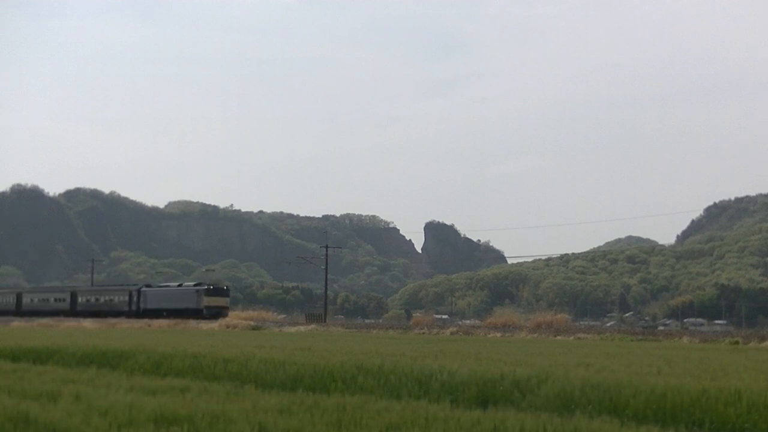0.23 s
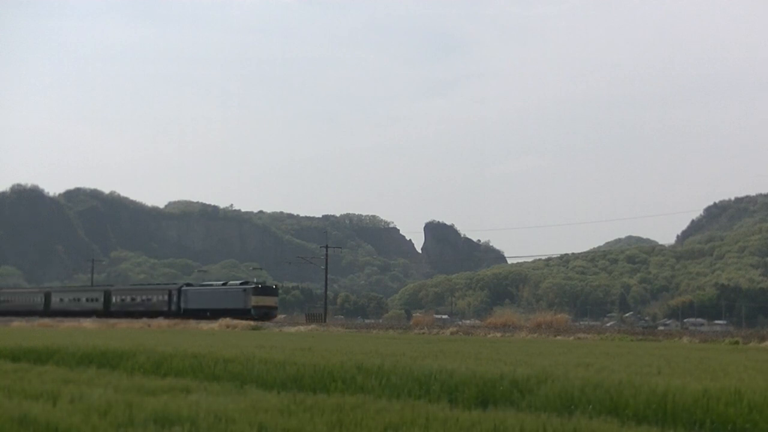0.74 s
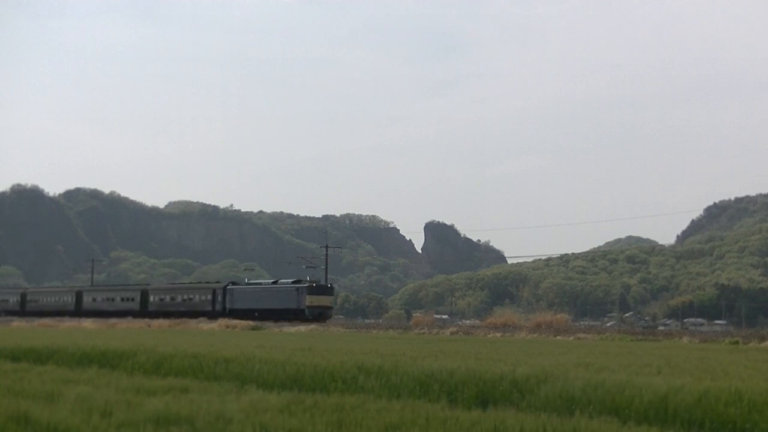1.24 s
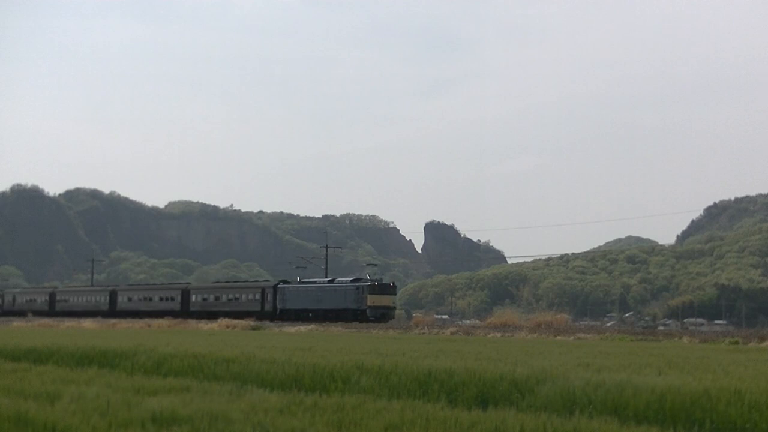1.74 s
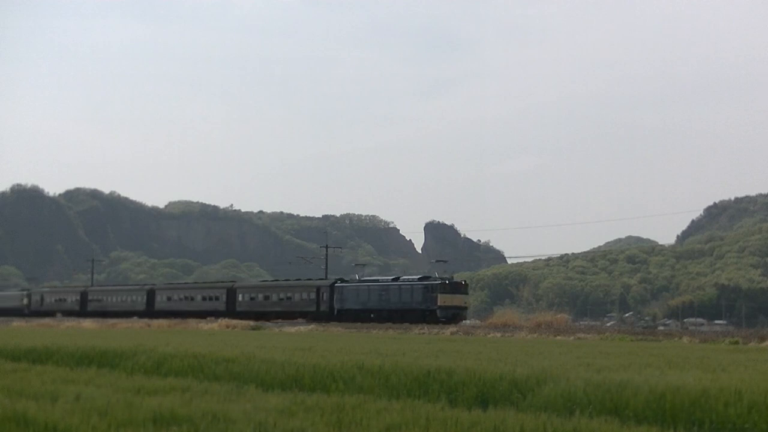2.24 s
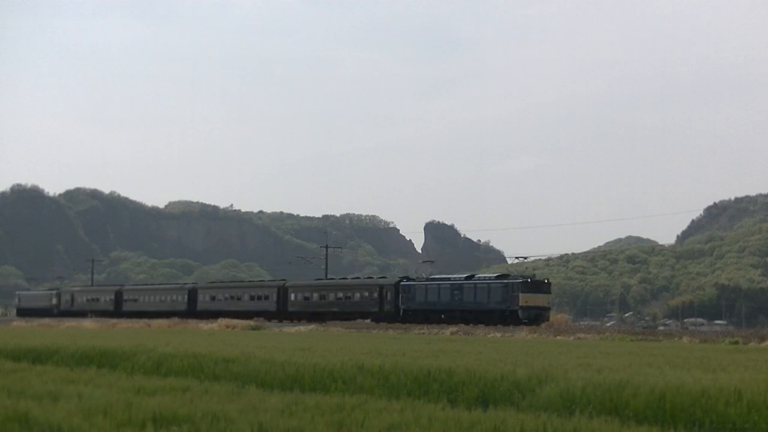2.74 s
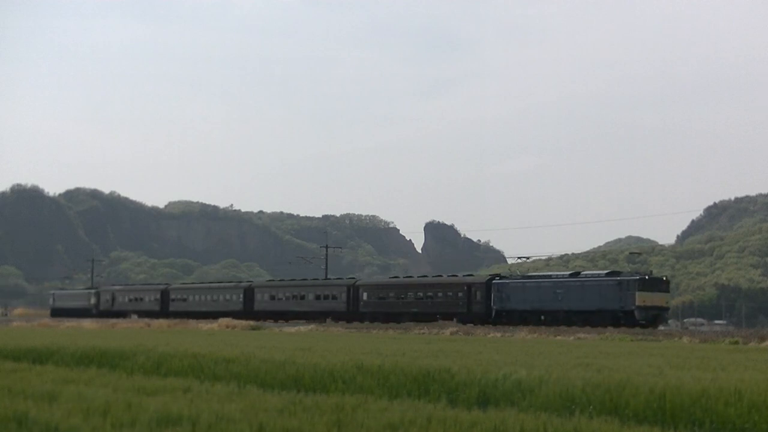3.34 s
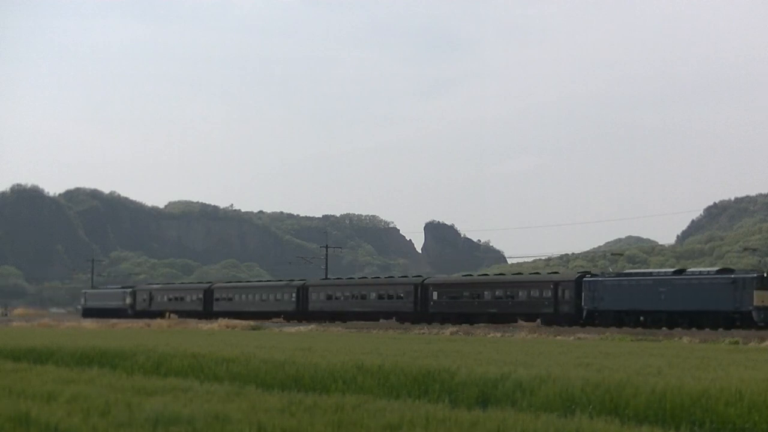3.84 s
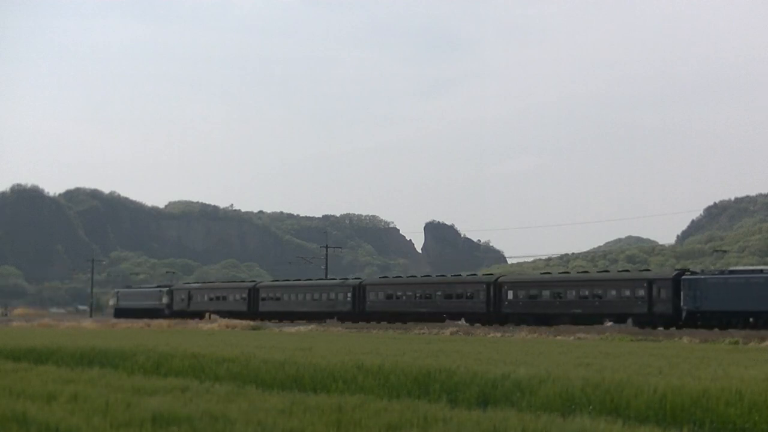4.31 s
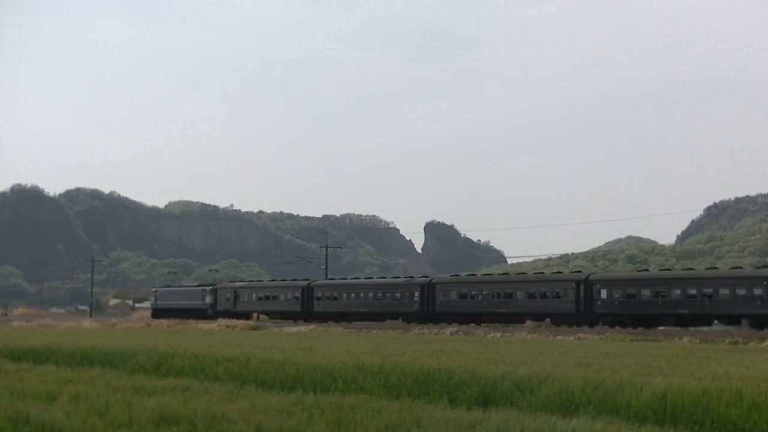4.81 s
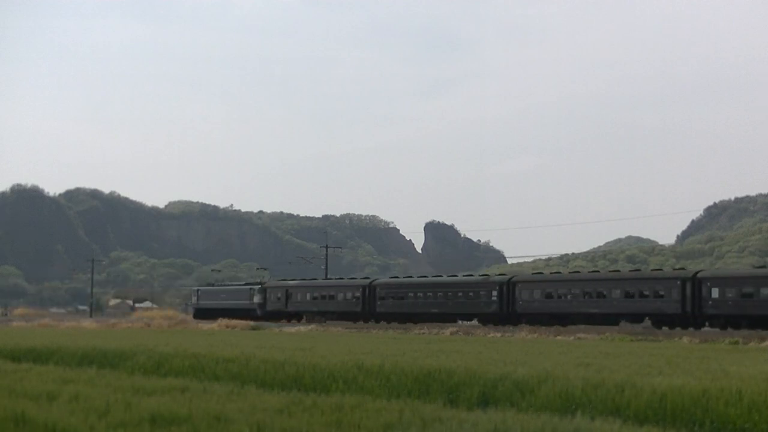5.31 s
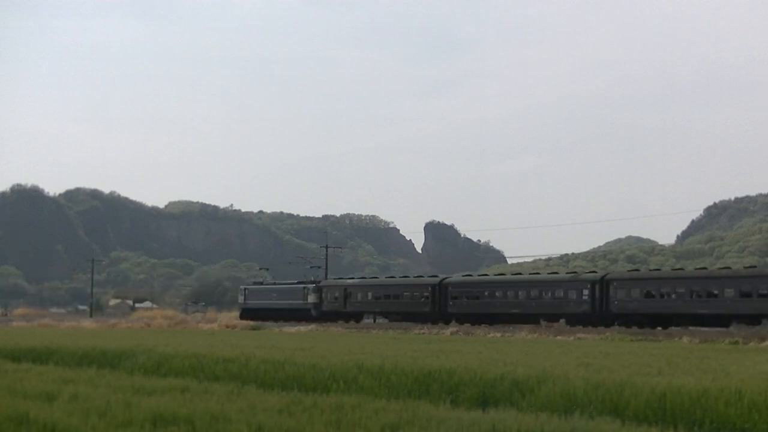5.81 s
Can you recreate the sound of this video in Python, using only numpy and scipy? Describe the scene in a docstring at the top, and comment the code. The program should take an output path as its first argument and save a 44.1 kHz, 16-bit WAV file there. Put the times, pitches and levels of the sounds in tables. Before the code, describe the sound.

In an open field, a light wind gusts softly for the first second or so, with the low, faint roll of a distant train beneath. Close to the microphone, a few quiet camera clicks come at 0.1 to 0.7 s, then sharper ones from 0.8 s. A steady shutter burst runs from about 1.4 to 2.7 s, roughly eight a second. At 1.9 s one high, piercing, slightly fluttering whistle blows for half a second, sags at its end and leaves a faint echo. From 2.6 to 4.2 s louder, overlapping bursts chatter, densest around 2.8 s. The train's rumble, roar and hiss build. From 4.2 s axles thud over rail joints, with a few stray clicks; from 5.2 s the steel clangs grow bright and hard. Flanges rub thinly at 4.6 s, then hiss broadly, and a wheel squeals briefly at 5.5 s. The clatter is still loud at 6 s.

```python
"""Camera clicks and a light, gusty wind are heard first, over the faint roll of a distant train.
An electric locomotive pulling old coaches draws near past open fields and gives one short, high whistle.
Wind and wheels are coloured noise; rail joints and camera parts are blows that ring and die.
Rubbing flanges make a fuzzy note and a broad hiss, and one wheel sings as a single tone.
The whistle is a set of fluttering tones, driven by air pressure and echoed by the surroundings."""
import sys
import numpy as np
from scipy import signal
from scipy.fft import rfft, irfft, next_fast_len
from scipy.io import wavfile
from scipy.ndimage import map_coordinates

SR = 44100
rng = np.random.default_rng(int(sys.argv[2]) if len(sys.argv) > 2 else 0)


def log_audio(samples):
    """Write samples as a 16-bit WAV file to the path given in sys.argv[1]."""
    # one column per channel
    frames = np.atleast_2d(samples).T
    # limit to full scale, then quantise
    limited = np.clip(frames, -1, 1)
    pcm = np.round(limited * 32767).astype(np.int16)
    wavfile.write(sys.argv[1], SR, pcm)


N = 267246


def amp(db):
    """Turn decibels into a gain."""
    return 10 ** (np.asarray(db) / 20)


def unit(x):
    """Scale to rms 1."""
    return x / np.sqrt(np.mean(x ** 2) + 1e-20)


def along(points, hz):
    """Read a (pitch, value) table at any pitch, on a log pitch axis."""
    f, v = np.transpose(points)
    return np.interp(np.log(hz + 1), np.log(f + 1), v)


def colour_of(points):
    """Turn a (pitch_hz, level_db) table into a gain for each pitch."""
    return lambda hz: amp(along(points, hz))


def curves(rows):
    """Draw each column after the time as a curve with one value per sample."""
    s, *cols = np.transpose(rows)
    return [np.interp(np.arange(N) / SR, s, c) for c in cols]


def ramp(start, length):
    """0 until start, then a straight rise to 1 over length seconds."""
    return np.clip((np.arange(N) / SR - start) / length, 0, 1)


def wobble(rate):
    """A smooth random curve with rate random points a second."""
    return map_coordinates(rng.standard_normal(int(N * rate / SR) + 4), [np.arange(N) * rate / SR])


def bell(hz, centre_hz, width_hz):
    """Shape of one resonance, 1 at its centre."""
    return 1 / np.sqrt(1 + (2 * (hz - centre_hz) / width_hz) ** 2)


def pan(db):
    """Left and right gains; positive db makes the left louder by that much."""
    return amp([[db / 2], [-db / 2]])


def add(track, s, sound):
    """Mix a sound into the track at time s."""
    part = track[:, max(round(s * SR), 0):][:, :sound.shape[1]]
    part += sound[:, :part.shape[1]]


# how alike the two ears hear noise: pitch_hz, likeness (1 = the same)
LIKENESS = [(60, 1), (130, 0.98), (290, 0.84), (640, 0.92), (1410, 0.91), (3100, 0.88), (6820, 0.95),
            (15000, 1)]


def noise(colour, size):
    """Stereo noise of rms 1 with the gain colour(hz), nearly alike in both ears."""
    length = next_fast_len(size)
    hz = np.fft.rfftfreq(length, 1 / SR)
    turn = np.arccos(np.clip(along(LIKENESS, hz), 0, 1)) / 2
    white = rfft(rng.standard_normal((2, length)))
    mid, side = irfft(white * colour(hz) * [np.cos(turn), np.sin(turn)], length)[:, :size]
    return unit(np.array([mid + side, mid - side]))


def narrow(hz, width_hz):
    """A fuzzy note of rms 1 that follows the pitch curve hz."""
    phase = 2 * np.pi * np.cumsum(hz) / SR
    return unit(wobble(width_hz) * np.sin(phase) + wobble(width_hz) * np.cos(phase))


def struck(colour, envelope, contact_db):
    """A body rings after a blow: one sharp contact, with chatter under the envelope around it."""
    size = len(envelope)
    push = noise(np.ones_like, size) * envelope
    push[:, np.argmax(envelope)] += amp(contact_db) * envelope.max()
    cepstrum = irfft(np.log(colour(np.fft.rfftfreq(size, 1 / SR)) + 1e-6), size)
    body = np.exp(rfft(2 * cepstrum[:size // 2], size))  # rings only after the push, with that colour
    return unit(irfft(rfft(push) * body, size)) * np.sqrt(np.mean(envelope ** 2))


# how long the surroundings ring: pitch_hz, fall_by_60_db_s
SURROUNDINGS = [(200, 0.5), (2500, 0.36), (10000, 0.29)]


def scatter(x, delay):
    """Diffuse answer of the surroundings after delay seconds; the treble dies first."""
    hz, t, z = signal.stft(rng.standard_normal((2, SR // 2)), SR, nperseg=256)
    decay = 1e-3 ** (t / along(SURROUNDINGS, hz)[:, None])
    tail = signal.istft(z * decay, SR, nperseg=256)[1]
    late = np.pad(x, ((0, 0), (int(delay * SR), 0)))
    return signal.fftconvolve(late, tail / np.linalg.norm(tail[0]), axes=1)[:, :N]


# tone of the wind's buffeting: pitch_hz, level_db
BUFFET = [(22, -52), (35, -16), (60, -3), (120, 0), (200, -9.5), (400, -27), (1000, -25.5), (4000, -50)]
# tone of air stirring the field: pitch_hz, level_db
RUSTLE = [(2000, -9.5), (5000, -3), (8000, -2.5), (11500, 1.5), (13000, -2), (15500, -11)]
# gusts, before the boost at the end of wind(): middle_s, half_width_s, level_db
GUSTS = [(.35, 0.029, -49.5), (.49, 0.12, -48), (.555, 0.023, -43.5), (.7, 0.093, -53.5)]
# the breeze at first and the lull that follows, both before the same boost
BREEZE_DB, LULL_S, LULL_FALL_S, LULL_DB = -54, 1.32, 0.38, -73


def wind():
    """A breeze gusts and dies down, pushing on the left port, pulling on the right; the field rustles."""
    t = np.arange(N) / SR
    force = amp(BREEZE_DB + (LULL_DB - BREEZE_DB) * ramp(LULL_S, LULL_FALL_S))
    for s, width, db in GUSTS:
        force = force + amp(db) * np.exp(-((t - s) / width) ** 2)
    shared, own = [force * amp(wobble(14)) * noise(colour_of(BUFFET), N)[0] for _ in range(2)]
    buffeting = np.array([shared, -.52 * shared + 0.2 * own]) * amp(7.0)
    rustle = amp(-67.5 + 1.2 * wobble(21)) * noise(colour_of(RUSTLE), N)
    return buffeting + rustle


# tone of the low rumble, the roar and the rail hiss, each: pitch_hz, level_db
RUMBLE = [(22, -52.5), (30, -30), (45, -17), (60, 3), (78, -6), (112, -0.5), (160, -11), (230, -19.5),
          (340, -30.5), (570, -70)]
ROAR = [(120, -11.5), (200, -9), (305, 1), (390, -6.5), (490, -4), (570, -3), (730, -2.5), (900, -2),
        (1300, -1.94), (2000, -8.5), (3200, -24), (6000, -64.5)]
HISS = [(700, -14), (1500, -6.5), (2300, 2), (3500, -1.5), (5300, -1.5), (6000, -9.5), (7200, -9.5),
        (8100, -20.5), (9200, -17), (11000, -28.5), (15500, -32.5)]
# wheel and rail resonances: pitch_hz, width_hz, lift_db
WHEELS = [(843, 73, 4), (1820, 38, 2), (2135, 60, 6.5), (2802, 60, 6.5), (3295, 140, 4.5), (4020, 260, 3.5)]
# how the train draws near, used relative to NEAR_DB: time_s, level_db
APPROACH = [(0.0, -52), (0.99, -52.5), (2.68, -46), (4.74, -43.5), (5.11, -43), (5.65, -39.5),
            (6.06, -39.5)]
NEAR_DB = -44
# rise and fall of the rumble, before panning: time_s, level_db
RUMBLE_LEVEL = [(0, -58), (.8, -55.5), (1.25, -54.5), (1.85, -58.5), (2.45, -53), (3.0, -56.5),
                (3.6, -48.5), (4.15, -55.5), (4.6, -50.5), (5.15, -53.5), (6.06, -52)]
# rise of the hiss, before a small cut in rolling(): time_s, level_db
HISS_LEVEL = [(0, -53.8), (.3, -50.5), (1.85, -49.5), (2.5, -45), (3.7, -40.5), (4.2, -43), (5.15, -41.5),
              (5.5, -40), (6.06, -39.5)]
# two wheel hums: pitch_hz, width_hz, level_db at NEAR_DB, growth in db per db of approach
HUMS = [(612.5, 70, -55, 2.4), (934, 70, -55.5, 1)]
# when and for how long the hums sink in pitch, and the share of pitch lost each second
PASS_S, PASS_LENGTH_S, DOPPLER_PER_S = 4.4, .9, 0.037


def rolling():
    """Rough wheels on rough rails: uneven rumble, and a roar, hiss and hums that build as the train nears."""
    near_db = curves(APPROACH)[0] - NEAR_DB
    hiss_db, = curves(HISS_LEVEL)
    rumble_db, = curves(RUMBLE_LEVEL)
    roar_db = -43.5 + 0.92 * near_db

    def ringing(hz):
        """Lift the noise at each wheel and rail resonance."""
        return 1 + sum((amp(db) - 1) * bell(hz, centre, width) ** 2 for centre, width, db in WHEELS)

    def rumble_colour(hz):
        """Add a low drone to the rumble."""
        return colour_of(RUMBLE)(hz) * (1 + .8 * bell(hz, 104, 16))

    rumble = amp(rumble_db + .6 * wobble(21)) * noise(rumble_colour, N)
    roar = amp(roar_db + 0.8 * wobble(17)) * noise(lambda hz: colour_of(ROAR)(hz) * ringing(hz), N)
    hiss_gain = amp(hiss_db - 0.87 + 0.52 * wobble(8.1))
    hiss = hiss_gain * noise(lambda hz: colour_of(HISS)(hz) * ringing(hz), N)
    doppler = 1 - DOPPLER_PER_S * PASS_LENGTH_S * ramp(PASS_S, PASS_LENGTH_S)
    hum = 0
    for hz, width, db, growth in HUMS:
        hum = hum + amp(db + growth * near_db + 1.6 * wobble(8)) * narrow(hz * doppler, width)
    return rumble * pan(1.1) + roar + hiss + hum


# tone of the close flange noise: pitch_hz, level_db
SCRAPE = [(3000, -31), (4500, 0), (5600, -2.5), (6400, -1.5), (7200, -4), (8000, -24), (11000, -33)]
# flanges start to rub the rail head
FLANGE_S, FLANGE_RISE_S, FLANGE_DB = 4.62, .22, -56.5
# their singing note sinks as they pass
FLANGE_HZ, FLANGE_WIDTH_HZ, FLANGE_SAG_HZ_PER_S = 6990, 260, 450
# the rubbing turns broad and loud
SPREAD_S, SPREAD_RISE_S, SPREAD_DB = 5.11, 0.18, -47.5


def flanges():
    """Flanges rub the rail: a thin, sinking note gives way to a broad hiss as the wheels come close."""
    spread = ramp(SPREAD_S, SPREAD_RISE_S)  # share of the broad hiss
    hz = FLANGE_HZ - FLANGE_SAG_HZ_PER_S * (np.arange(N) / SR - FLANGE_S)
    thin = amp(FLANGE_DB) * ramp(FLANGE_S, FLANGE_RISE_S) * narrow(hz, FLANGE_WIDTH_HZ)
    broad = amp(SPREAD_DB) * noise(colour_of(SCRAPE), N)
    return amp(2.1 * wobble(20)) * (np.sqrt(1 - spread) * thin + spread * broad)


SQUEAL_S, SQUEAL_LENGTH_S, SQUEAL_FADE_S = 5.51, 0.26, .04
SQUEAL_HZ, SQUEAL_SAG_HZ_PER_S, SQUEAL_DB = 1282, 120, -46


def squeal():
    """One wheel sings briefly at a single mode, sinking a little as it passes."""
    hz = SQUEAL_HZ - SQUEAL_SAG_HZ_PER_S * (np.arange(N) / SR - SQUEAL_S)
    fade_out_s = SQUEAL_S + SQUEAL_LENGTH_S - SQUEAL_FADE_S
    envelope = ramp(SQUEAL_S, SQUEAL_FADE_S) - ramp(fade_out_s, SQUEAL_FADE_S)
    tone = np.sin(2 * np.pi * np.cumsum(hz) / SR + 0.17 * wobble(60))
    return envelope * amp(SQUEAL_DB + 1.9 * wobble(25)) * np.sqrt(2) * tone


# ways the track bed shakes: pitch_hz, level_db within the thud, swell_s
TRACK_BED = [(127.4, -1, 0.014), (89.5, -6.5, 0.015), (169, -11, 0.017), (376, -9, 0.014)]


def thud():
    """The track bed swells and settles in a few low, heavily damped modes."""
    t = np.arange(SR // 4) / SR
    total = 0
    for hz, db, swell in TRACK_BED:
        envelope = (t / swell * np.exp(1 - t / swell)) ** 2
        near_hz = hz * (1 + 0.038 * rng.standard_normal())
        total = total + amp(db) * envelope * np.sin(2 * np.pi * near_hz * t)
    return total


def clang(colour, attack, t60, size):
    """A blow on steel with many close modes: coloured noise that swells and dies."""
    t = np.arange(size) / SR
    envelope = (1 - np.exp(-t / attack)) * np.exp(-np.log(1000) * t / t60)
    return struck(colour, envelope / envelope.max(), contact_db=18)


# an axle drops into a rail joint, mostly two to a bogie:
# time_s, thud_db, clang_db, clang_fall_by_60_db_s, clang_treble_db
JOINTS = [(4.18, -37.5, -46, .12, -4), (4.306, -41.5, -50, 0.095, -6), (4.368, -42, -40.5, .1, -10),
          (4.427, -39, -55, 0.18, -6), (4.555, -36, -45.5, 0.17, -12), (4.665, -34.5, -42, 0.15, 6),
          (4.79, -37, -45, 0.12, -6), (4.984, -43.5, -56, .12, -6), (5.102, -38, -50, 0.11, -6),
          (5.27, -45, -31.5, 0.2, -10), (5.4, -50, -31, 0.16, -1), (5.515, -48, -31, 0.12, 0),
          (5.573, -54, -35, 0.082, -1.5), (5.644, -46, -29.5, 0.18, 0.5), (5.759, -42, -30, 0.11, 2.5),
          (5.798, -57, -36.5, 0.11, -9), (5.889, -43, -33.5, 0.19, 3), (5.921, -53, -35.5, 0.13, 2),
          (6.015, -43, -41, 0.15, -3)]
# tone of the steel: pitch_hz, level_db
STEEL = [(25, -45), (100, -3.5), (200, -4), (400, -3.5), (490, -5.5), (560, -0.5), (640, 0.5), (740, -6.5),
         (1000, -1), (1400, -14.5), (1900, -6), (2400, -15), (3500, -12.5), (5000, -17.5), (9000, -46),
         (15000, -67)]


def joints():
    """Each axle drops into a rail gap: the track bed thuds and the steel clangs."""
    track = np.zeros((2, N))
    for s, thud_db, clang_db, t60, treble_db in JOINTS:
        def steel(hz):
            """Tilt the treble of the steel for this blow."""
            return amp(along(STEEL, hz) + treble_db * np.clip((hz - 2000) / 1000, 0, 1))
        add(track, s, amp(thud_db) * thud() * pan(.5))
        add(track, s, amp(clang_db) * clang(steel, attack=.0025, t60=t60, size=16384))
    return track


# tone of a camera body: pitch_hz, level_db
CASING = [(200, -29), (600, -6), (1200, -1), (2500, 2), (4000, 1), (5500, 0), (7000, -4.5), (8100, -11.5),
          (9500, -10.5), (11500, -17.5), (15500, -25.5)]
LEAD = 2 ** 9  # samples that a camera part slides before it hits its stop
DETUNE = .02  # random spread of the ring pitch, as a share of it


def click(t60, ring_hz, ring_db, treble_db, snap_db):
    """One stroke inside a camera: the part slides, then hits its stop and rings through the casing."""
    centre_hz = ring_hz * (1 + DETUNE * rng.standard_normal())

    def colour(hz):
        """Casing tone with its treble tilted and one ring lifted."""
        casing = amp(along(CASING, hz) + treble_db * np.clip((hz - 4500) / 5500, 0, 1))
        return casing * (1 + (amp(ring_db) - 1) * bell(hz, centre_hz, 0.18 * centre_hz) ** 2)

    t = np.arange(-LEAD, 7 * LEAD) / SR
    slide = amp(-11) * np.exp(np.minimum(t, 0) / 0.0053)
    age = np.maximum(t, 0)
    blow = amp(-1.1) * np.exp(-np.log(1000) * age / t60) * (1 + 0.14 * np.exp(-age / 0.00082))
    return struck(colour, np.where(t < 0, slide, blow), snap_db)


def camera(exposures, level, cycle, rattle_db, size):
    """Each exposure repeats a cycle of strokes, with size small gear ticks scattered between them."""
    first_db, drift_db = level
    track = np.zeros((2, N))
    begin, end = cycle[0][0], cycle[-1][0]
    for s in exposures:
        db = first_db + drift_db * (s - exposures[0])
        for offset, stroke_db, *stroke in cycle:
            gain = amp(db + stroke_db + rng.normal(0, 0.9))
            add(track, s + offset - LEAD / SR, gain * click(*stroke))
        for when, pitch, softness in rng.random((size, 3)):
            offset = begin + when * (end - begin)
            tick = click(.012, 3000 + 7000 * pitch, ring_db=6, treble_db=4, snap_db=12)
            add(track, s + offset - LEAD / SR, amp(db + rattle_db - 5.6 * softness) * tick)
    return track


def evenly(first, period, count):
    """Exposure times of a steady burst."""
    return first + period * np.arange(count)


# strokes of mirror, shutter and winder in each camera's cycle, level relative to its burst:
# offset_s, level_db, fall_by_60_db_s, ring_hz, ring_db, treble_db, first_contact_over_chatter_db
FAR_CYCLE = [(-.052, -6.5, .05, 5000, 8, -4, 4), (-.02, -2, .04, 5560, 10, -8, 4),
             (0, 2.5, .022, 5100, 12, -1, 14), (.035, 0.5, .04, 5000, 10, -0.5, 8)]
FIRST_CYCLE = [(-.036, -7.5, 0.057, 6260, -1, -4, -1), (-.021, -3.5, 0.015, 5900, 7.5, 1.5, 2.5),
               (-.017, -1, 0.014, 5900, 6.5, 3.5, -2), (0, 3, .02, 2960, 9, -6.5, 9),
               (.018, -10, 0.045, 3000, 5.5, -3, 3), (.031, -13.5, .05, 6500, 3, -1, 6),
               (.043, -5.5, .016, 6480, 13, -3, 10), (.055, -3.5, 0.014, 6400, 7, -2.5, 9.5)]
SECOND_CYCLE = [(-.077, -1, 0.075, 8900, 3, 2.5, -2), (-.062, -6.5, 0.032, 8800, 3, 1, 8),
                (-.043, -8, .022, 9000, 17, 3.5, 8.5), (-.03, -6.5, .018, 1300, 24, -7, 25),
                (-.016, -1, 0.033, 3430, 9.5, 6, 6.5), (-.013, -3, .014, 4500, 3, 1, 2),
                (0, 2.5, .016, 5200, 21, -2.5, 10), (.013, 0, 0.017, 2760, 10, 0, 12.5)]
THIRD_CYCLE = [(-.011, -7.5, 0.025, 2800, 3, 6, 6), (.0003, 1.5, 0.012, 3730, 18, 1.5, 15.5),
               (.001, -2, 0.021, 1430, 15, -10, 18), (0.032, -5.5, 0.045, 3800, 7.1, 2, 4),
               (.032, -2.5, .022, 1420, 28, -10, 24), (.059, -0.5, 0.024, 3560, 3.5, -6, 6),
               (0.0637, -1.5, 0.03, 2790, 7.9, 4.5, 14)]
# the far, second and third cameras fire evenly: first_exposure_s, period_s
BURSTS = [(.275, .166), (2.575, .1427), (2.917, .1071)]
# the first camera's exposures, with one hesitation: time_s
FIRST_EXPOSURES = [1.432, 1.5522, 1.673, 1.794, 1.916, 2.044, 2.165, 2.284, 2.405, 2.525, 2.645]
# far, first, second and third camera, before panning: level_db, drift_db_per_s
BURST_LEVELS = [(-39.5, 4.5), (-31, 1), (-32.5, 1), (-31, 1.65)]
# single shutter clicks, before panning: time_s, level_db, fall_by_60_db_s, ring_hz, ring_db
CLICKS = [(0.06, -46.5, 0.014, 5500, 23), (.847, -37, 0.022, 4900, 2), (.931, -41.5, 0.03, 4460, 18),
          (1.045, -36, 0.028, 4970, 5), (1.243, -35, 0.027, 5000, -2), (1.262, -31, 0.029, 5850, 8.5),
          (1.314, -29, 0.027, 3020, 13.5), (1.331, -37.5, 0.055, 5000, -5), (1.355, -35.5, .03, 6400, 8),
          (2.595, -33.5, .015, 3600, 12), (2.627, -34.5, 0.041, 3180, 6), (2.703, -27.5, 0.032, 2400, 3.5),
          (2.711, -26.5, 0.041, 2420, 11), (2.748, -21, 0.057, 2560, 6.5), (2.76, -24.5, .045, 8400, 11),
          (2.801, -24, .04, 2500, 7), (2.816, -25, 0.054, 2400, 6), (2.84, -21.5, 0.025, 2420, 3.5),
          (2.844, -24, 0.06, 3970, -15), (2.86, -24.5, 0.044, 8300, 12.5), (2.877, -23, 0.048, 2920, -4),
          (2.916, -29.5, 0.027, 6500, 12.5), (2.944, -27, 0.023, 6500, 15), (2.959, -25.5, .035, 2330, 10),
          (4.308, -36, 0.014, 6840, 8), (4.621, -34, 0.012, 5400, 22), (4.995, -41.5, .03, 9400, 8),
          (5.023, -34, 0.023, 8900, 8)]
# the nearest camera cocks its shutter again; level before panning
WINDER_S, WINDER_DB, WINDER_T60_S = 2.882, -29.5, 0.33


def shutters():
    """A row of cameras beside the microphone fires bursts and single clicks; the surroundings answer."""
    far, second, third = BURSTS
    far_level, first_level, second_level, third_level = BURST_LEVELS
    track = camera(evenly(*far, count=3), far_level, FAR_CYCLE, rattle_db=-6, size=5) * pan(0.54)
    track += camera(FIRST_EXPOSURES, first_level, FIRST_CYCLE, rattle_db=-6, size=8) * pan(.6)
    track += camera(evenly(*second, count=10), second_level, SECOND_CYCLE, rattle_db=-1, size=7) * pan(1.3)
    track += camera(evenly(*third, count=13), third_level, THIRD_CYCLE, rattle_db=-8.5, size=7) * pan(-0.49)
    singles = np.zeros((2, N))
    for s, db, t60, ring_hz, ring_db in CLICKS:
        add(singles, s - LEAD / SR, amp(db) * click(t60, ring_hz, ring_db, treble_db=3.5, snap_db=6))
    winder = click(WINDER_T60_S, ring_hz=2400, ring_db=4.0, treble_db=5.5, snap_db=5)
    add(singles, WINDER_S - LEAD / SR, amp(WINDER_DB) * winder)
    track += singles * pan(-1.1)
    return track + amp(-9) * scatter(track, delay=0.008)


# the levels in these three tables and AIR_DB come before the air pressure and panning shape them
# the held tone swells and fades on its way through the moving air: time_s, level_db
FUNDAMENTAL = [(1.885, -22), (1.907, -17), (1.922, -20.5), (1.938, -17.5), (1.952, -20.5), (1.985, -16),
               (2.003, -18.5), (2.045, -15.3), (2.063, -21), (2.08, -15.5), (2.1, -22), (2.123, -19),
               (2.16, -26.5), (2.205, -20), (2.235, -16), (2.27, -13), (2.32, -18)]
# its octave fades in its own way: time_s, level_db
OCTAVE = [(1.918, -44), (1.944, -28), (1.972, -47), (1.988, -45), (2.004, -31), (2.043, -28.5),
          (2.07, -35.5), (2.105, -31), (2.124, -27.5), (2.148, -34.5), (2.162, -49), (2.178, -46),
          (2.192, -30), (2.25, -34.5), (2.28, -29.5), (2.3, -46), (2.345, -31), (2.368, -46)]
# higher partials: multiple of the main pitch, level_db
OVERTONES = [(3, -55), (4, -72.5), (5, -75)]
VALVE_OPEN_S, VALVE_SHUT_S, SILENT_S = 1.855, 2.292, 2.393
# swell, hold after the valve shuts, drop, and the last air left in the pipe
ATTACK_S, HANG_S, RELEASE_S, DREGS_DB = 0.035, 0.026, 0.013, -17.5
# the pipe falters once before it speaks fully
CATCH_AFTER_S, CATCH_WIDTH_S, CATCH_DB = 0.019, 0.0034, -15
PIPE_HZ, SCOOP_HZ, SCOOP_S = 2747.7, 325, 0.016  # full pitch and the scoop up to it
SAG_HZ_PER_S, SAG_HZ_PER_S2 = 1150, 14000  # the quickening fall after the valve shuts
AIR_HZ, AIR_WIDTH_HZ, AIR_DB = 2500, 300, -51.5  # air rushing over the whistle's lip


def whistle():
    """The pipe scoops up to pitch and sags as the valve shuts; turbulent air makes each partial flutter."""
    t = np.arange(N) / SR
    opened, shut = np.maximum(t - VALVE_OPEN_S, 0), np.maximum(t - VALVE_SHUT_S, 0)
    scoop_hz = SCOOP_HZ * np.exp(-opened / SCOOP_S)
    pitch_hz = PIPE_HZ - scoop_hz - SAG_HZ_PER_S * shut - SAG_HZ_PER_S2 * shut ** 2
    phase = 2 * np.pi * np.cumsum(pitch_hz * (1 + .001 * wobble(70))) / SR

    catch = amp(CATCH_DB * np.exp(-((opened - CATCH_AFTER_S) / CATCH_WIDTH_S) ** 2))
    attack = ramp(VALVE_OPEN_S, ATTACK_S) * catch
    dregs = amp(DREGS_DB)
    release = dregs + (1 - dregs) * np.exp(-np.maximum(shut - HANG_S, 0) / RELEASE_S)
    pressure = attack * release * (1 - ramp(SILENT_S - .012, .012))

    (db,), (octave_db,) = curves(FUNDAMENTAL), curves(OCTAVE)
    tone = amp(db + 0.8 * wobble(90) + 0.28 * wobble(400)) * np.sin(phase)
    octave_phase = 2 * phase + .35 * wobble(49) + 0.39 * wobble(300)
    tone += amp(octave_db + 3.2 * wobble(90)) * np.sin(octave_phase)
    for k, partial_db in OVERTONES:
        flutter_db = 4 * wobble(80)
        partial = np.sin(k * phase + .5 * wobble(80))
        tone += pressure ** .5 * amp(partial_db + flutter_db) * partial
    tone += amp(AIR_DB) * narrow(np.full(N, AIR_HZ), AIR_WIDTH_HZ)

    direct = np.sqrt(2) * tone * pressure * pan(0.99)
    slap = np.pad(direct, ((0, 0), (int(.088 * SR), 0)))[:, :N]  # one distinct reflection
    near_echo = amp(-30.5) * scatter(direct, delay=0.064)
    far_echo = amp(-36.5) * scatter(direct, delay=0.21)
    return direct + amp(-23) * slap + near_echo + far_echo


def scene():
    """Wind, train, cameras and whistle together."""
    return wind() + rolling() + flanges() + squeal() + joints() + shutters() + whistle()


TOP_HZ = 15850


def record(dry):
    """The recorder keeps nothing above its band limit."""
    size = next_fast_len(N + SR // 2)
    kept = np.fft.rfftfreq(size, 1 / SR) < TOP_HZ
    return irfft(rfft(dry, size) * kept, size)[:, :N]


dry = scene()
out = record(dry)
log_audio(out)
```